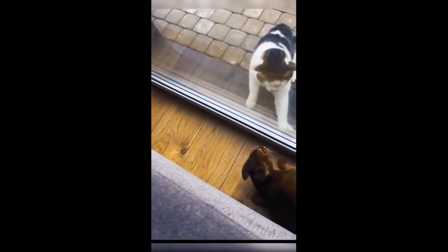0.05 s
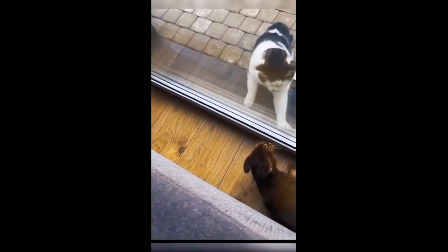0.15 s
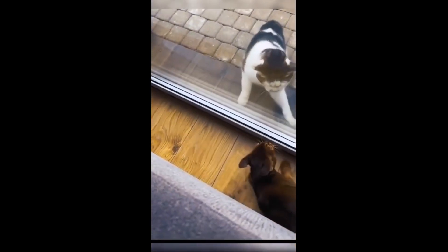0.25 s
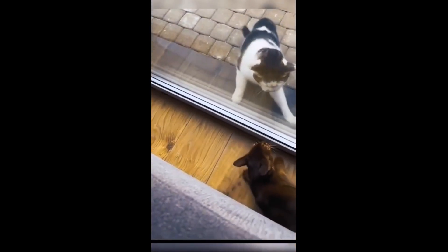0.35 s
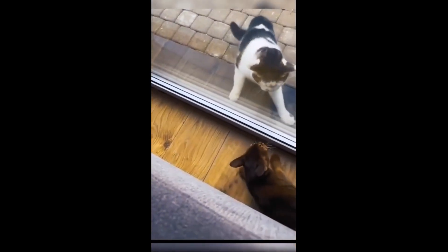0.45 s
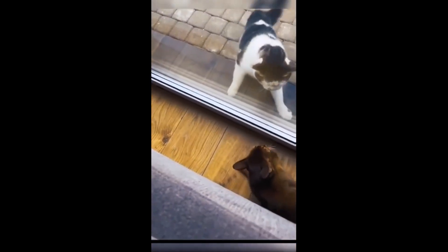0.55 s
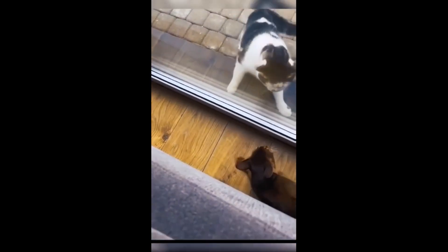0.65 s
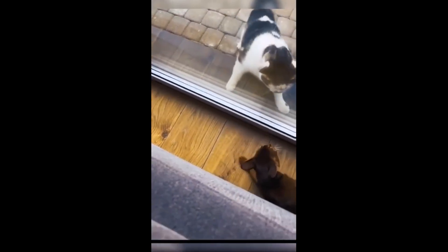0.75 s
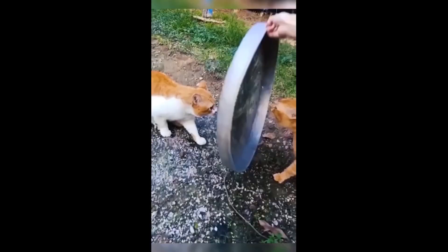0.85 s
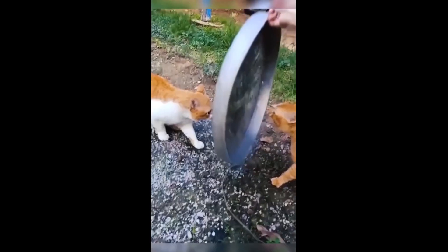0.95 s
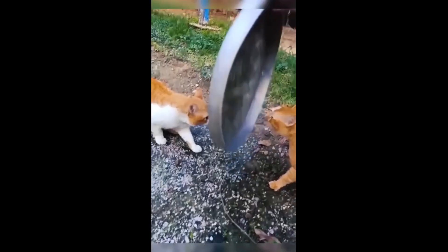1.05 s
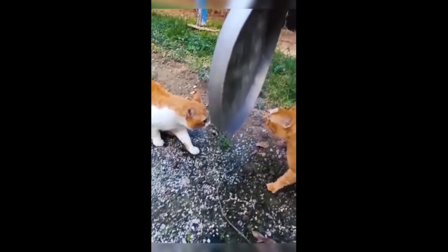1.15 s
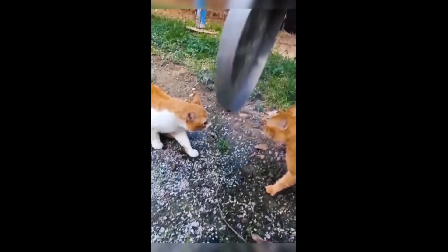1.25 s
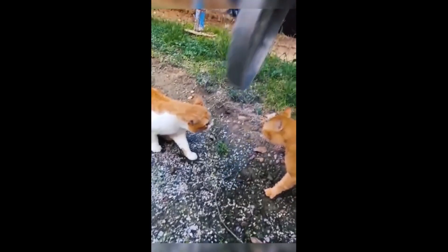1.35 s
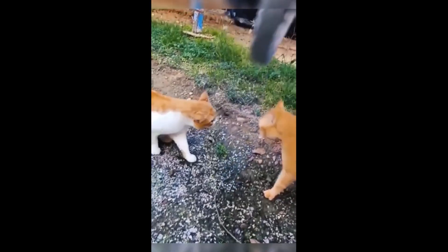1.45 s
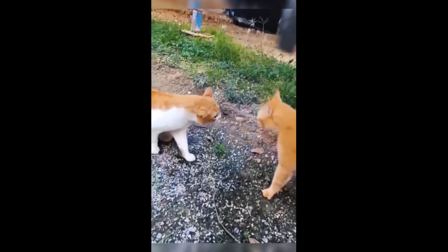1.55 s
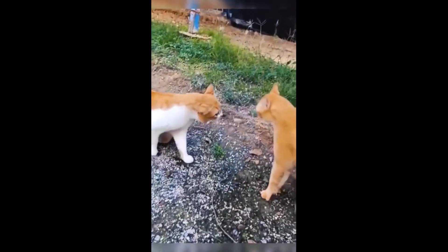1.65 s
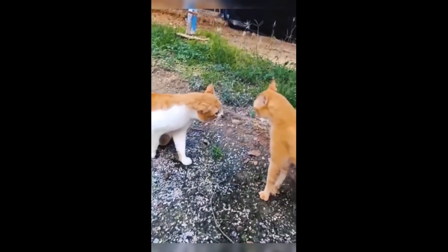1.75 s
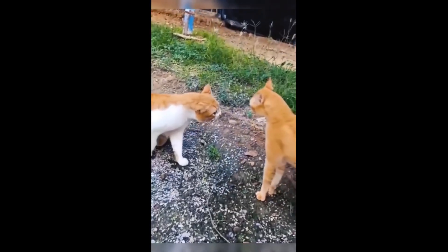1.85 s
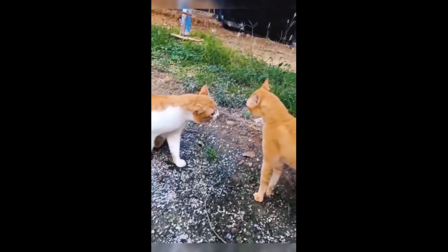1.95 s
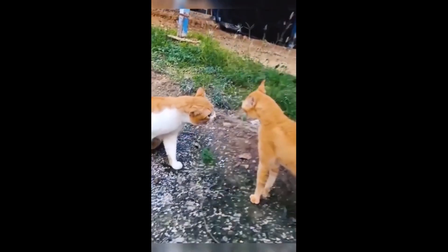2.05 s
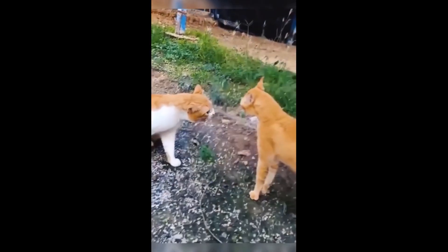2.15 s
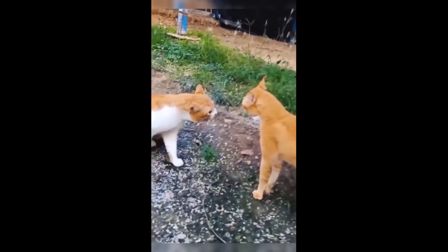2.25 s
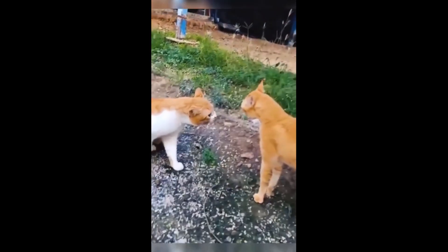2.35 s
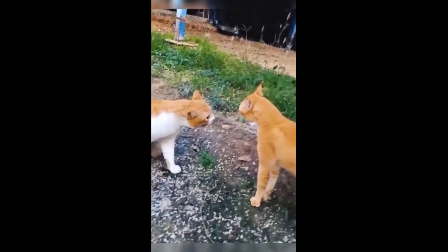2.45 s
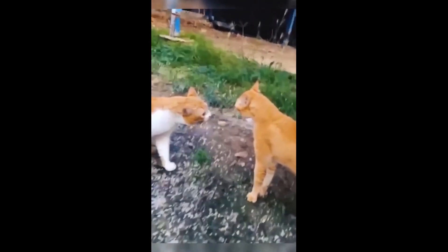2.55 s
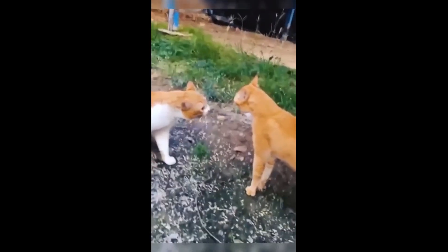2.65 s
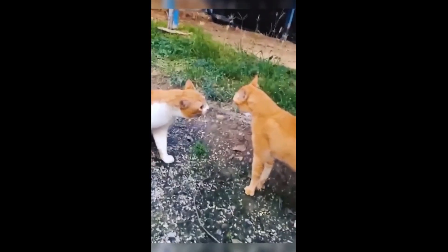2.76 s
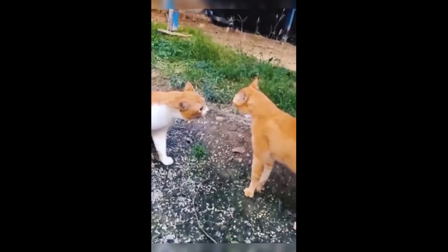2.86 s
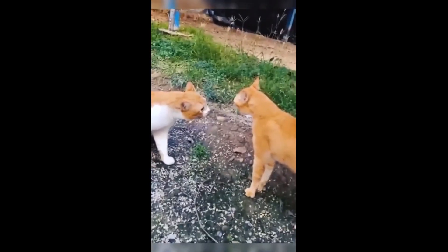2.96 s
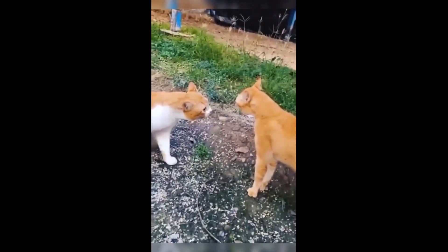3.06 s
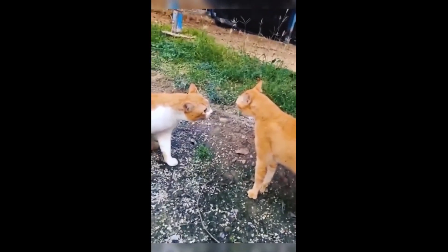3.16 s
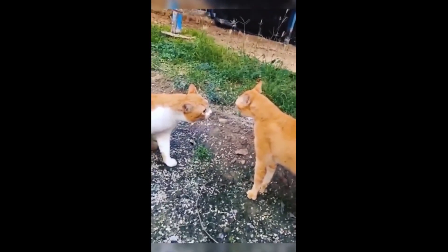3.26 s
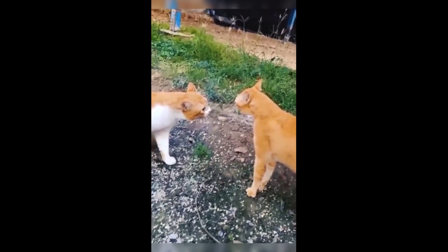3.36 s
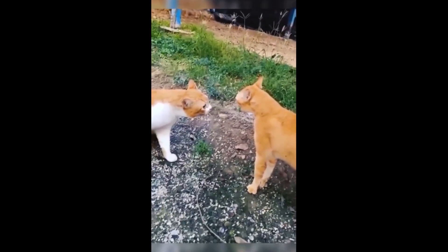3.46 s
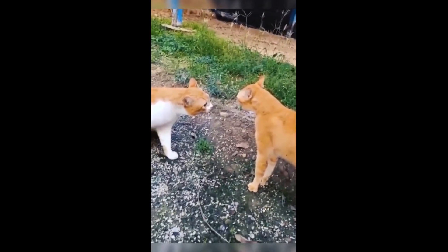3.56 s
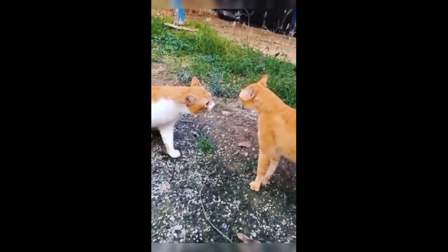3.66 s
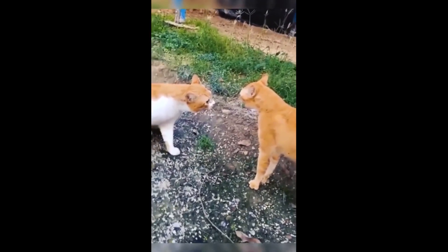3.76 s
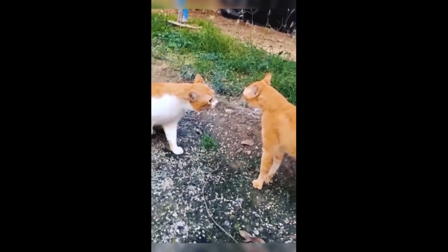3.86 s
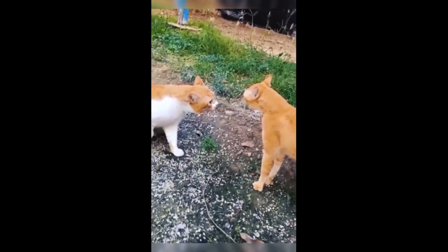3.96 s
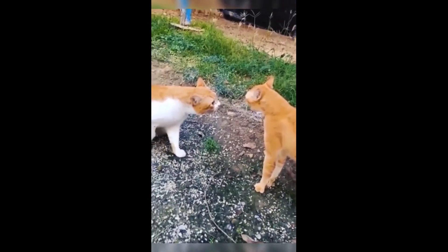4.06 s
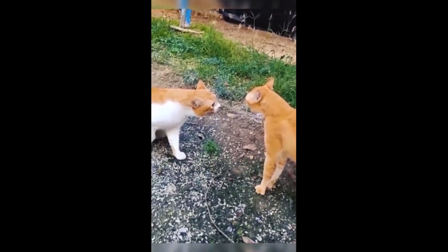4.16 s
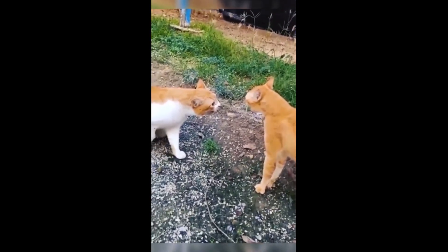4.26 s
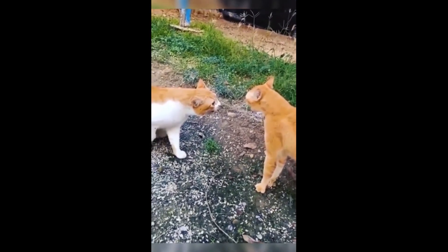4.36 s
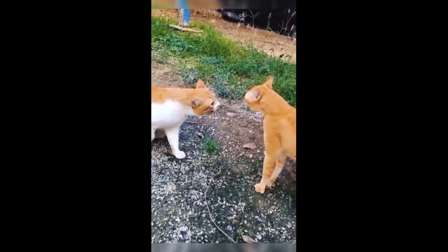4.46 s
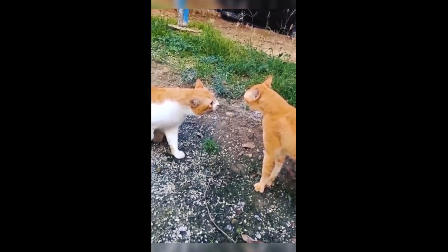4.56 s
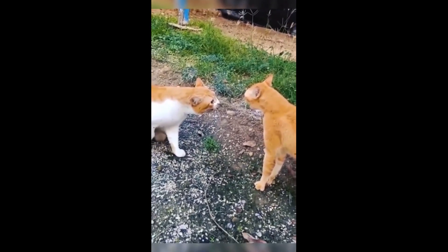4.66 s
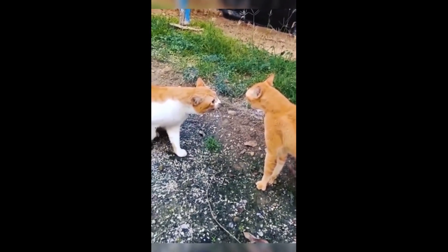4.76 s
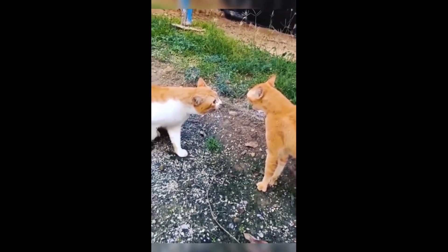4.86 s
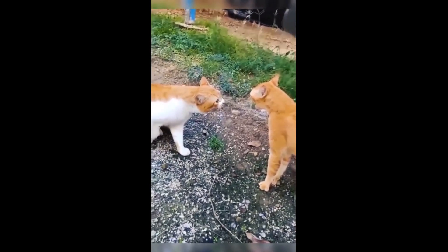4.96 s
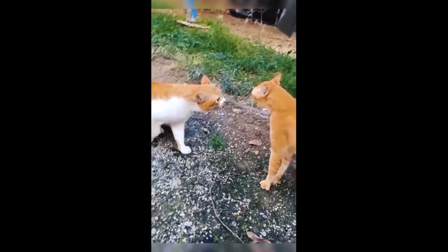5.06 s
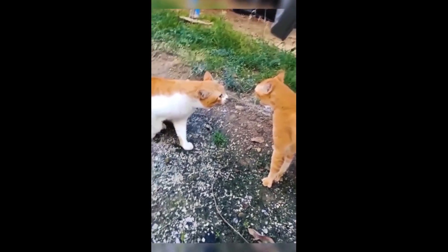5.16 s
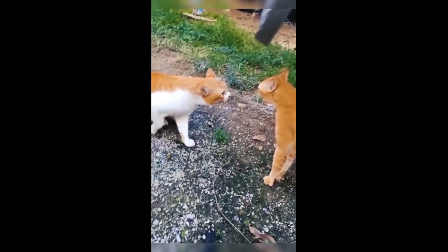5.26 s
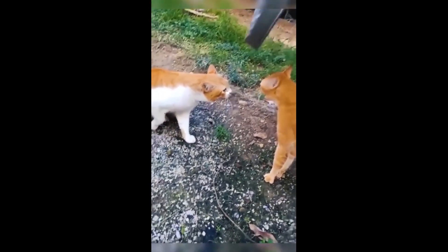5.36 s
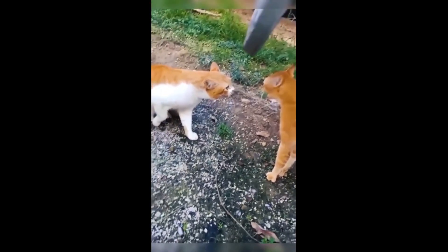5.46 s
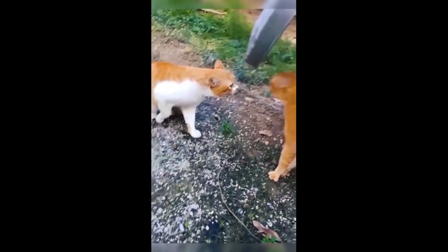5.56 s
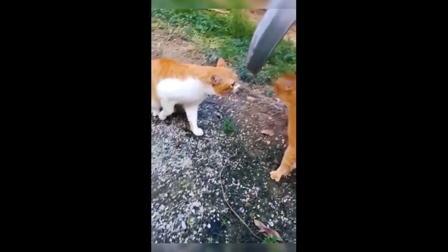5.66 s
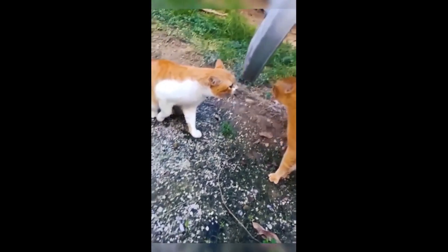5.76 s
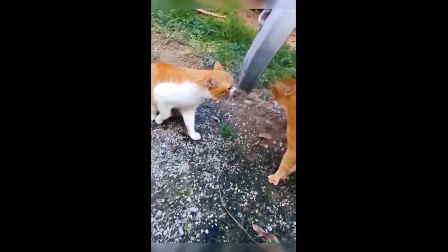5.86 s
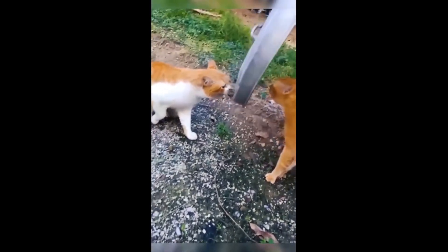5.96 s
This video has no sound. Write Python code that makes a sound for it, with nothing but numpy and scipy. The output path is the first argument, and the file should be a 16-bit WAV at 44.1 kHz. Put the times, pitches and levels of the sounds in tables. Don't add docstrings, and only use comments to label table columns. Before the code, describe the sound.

A brief raspy, hissing huff and knocks, then two cats face off outdoors: one screams and falls in long wavering yowls, the other moans low.

```python
import sys
import numpy as np
from scipy import signal
from scipy.fft import rfft, irfft
from scipy.io import wavfile
from scipy.ndimage import uniform_filter1d, minimum_filter1d

SR = 44100
rng = np.random.default_rng(int(sys.argv[2]) if len(sys.argv) > 2 else 0)


def wav_record(signal):
    frames = np.transpose(np.atleast_2d(signal))
    bounded = np.clip(frames, -1, 1)
    quanta = np.round(bounded * 32767).astype(np.int16)
    wavfile.write(sys.argv[1], SR, quanta)


def makeup_ratio(level_db):
    decades = np.asarray(level_db, float) / 20
    return 10 ** decades


N = 265482
YARD_S = 0.892
SHELF_HZ = 6550

# start_s, rasp_db
HUFF = [
    (0.0, -48),
    (0.126, -44.5),
    (0.16, -36.5),
    (0.284, -35),
    (0.306, -38),
    (0.346, -38.5),
    (0.422, -45.5),
    (0.482, -65),
    (0.52, -67),
]


def rms_one(x):
    return x / np.sqrt(np.mean(x ** 2) + 1e-20)


def at_hz(points, hz):
    return np.interp(np.log(hz), np.log(np.array(points)[:, 0]), np.array(points)[:, 1])


def in_time(rows):
    s, *columns = np.transpose(rows)
    return [np.interp(np.arange(N) / SR, s, c) for c in columns]


def drift(rate_hz, size):
    r = np.exp(-2 * np.pi * rate_hz / SR)
    return rms_one(signal.lfilter([1], [1, -2 * r, r * r], rng.standard_normal(size + 9000))[9000:])


def coloured(x, spectrum):
    hz = np.maximum(np.fft.rfftfreq(N, 1 / SR), 1)
    return rms_one(irfft(rfft(x) * makeup_ratio(at_hz(spectrum, hz)), N))


def resonate(x, hz, width_hz):
    r = np.exp(-np.pi * width_hz / SR)
    b = [(1 - r * r) / 2, 0, (r * r - 1) / 2]
    a = [1, -2 * r * np.cos(2 * np.pi * hz / SR), r * r]
    return signal.lfilter(b, a, x + 1e-18)


def bump(hz, centre_hz, width_hz, db):
    return makeup_ratio(db) / (1 + (2 * (hz - centre_hz) / width_hz) ** 2)


def near_cat():
    # start_s, pitch_hz, level_db, mouth_hz
    onset = [
        (1.392, 270.6, -49.5, 1070),
        (1.438, 382.4, -34, 1000),
        (1.47, 451.5, -41, 1100),
    ]
    rise = [(1.5, 547, -35, 2730), (1.56, 596, -22, 2570), (1.59, 639, -20.5, 2690),
            (1.612, 670.4, -12.5, 2620), (1.635, 708, -13.5, 2750), (1.66, 747, -16, 2930),
            (1.685, 776, -21.5, 3000), (1.72, 813.6, -16.5, 2582), (1.745, 843, -14.5, 2585),
            (1.77, 878.8, -11, 2590), (1.825, 905.6, -15.5, 2690), (1.845, 921, -16, 2663),
            (1.86, 923, -18, 2620)]
    peak = [
        (1.9, 922, -20, 2554),
        (1.95, 927, -19.5, 2448),
        (2.02, 905, -17.5, 2710),
        (2.078, 900, -16.5, 2550),
        (2.115, 886.7, -14, 2661),
        (2.15, 859, -16.5, 2616),
        (2.212, 858, -9.5, 2400),
        (2.228, 832, -17.5, 2400),
        (2.265, 805, -19, 2380),
        (2.3, 785.6, -25.5, 2430),
    ]
    slump = [
        (2.39, 775, -25, 2546),
        (2.42, 723, -30.5, 2040),
        (2.488, 713.5, -25.5, 1944),
        (2.546, 662, -27, 2437),
    ]
    fall = [
        (2.576, 549.2, -34, 2120),
        (2.72, 558, -32.5, 2080),
        (2.8, 548, -34.5, 2005),
        (2.9, 516, -24.5, 2107),
        (2.996, 505.5, -25, 2194),
        (3.1, 488.7, -25.5, 2053),
        (3.2, 460.3, -30, 1648),
    ]
    fade = [
        (3.292, 434.7, -34.5, 1547),
        (3.4, 420, -35, 1465),
        (3.5, 400, -30, 1530),
        (3.6, 395.4, -31, 1476),
        (3.7, 380, -30, 1500),
        (3.728, 376, -31, 1307),
        (3.754, 340, -37.5, 1310),
        (3.78, 319, -65.5, 1387),
    ]
    restart = [
        (4.25, 316.5, -51, 1256),
        (4.284, 339.3, -33, 1390),
        (4.304, 397.2, -35.5, 1380),
    ]
    swell = [
        (4.348, 454, -31.5, 1930),
        (4.39, 476, -28, 2180),
        (4.436, 497, -23, 2360),
        (4.526, 522, -22.5, 2470),
    ]
    again = [
        (4.6, 533.2, -23, 2535),
        (4.692, 537, -24.5, 2580),
        (4.776, 528.3, -23, 2480),
        (4.866, 505.3, -21.5, 2198),
        (5.122, 496, -22.5, 2130),
        (5.186, 487, -19, 2026),
        (5.324, 455.2, -29, 1550),
    ]
    mutter = [
        (5.366, 434.3, -22.5, 1320),
        (5.402, 435, -21.5, 1310),
        (5.43, 409.8, -31.5, 1150),
        (5.466, 381.6, -35, 1159),
        (5.61, 374.4, -32.5, 1214),
        (5.698, 349, -43, 1160),
        (5.762, 338.6, -37.5, 1160),
        (5.926, 334, -35, 1201),
        (6.02, 398.4, -25.5, 1527),
    ]
    # hz, db
    head, turned_head = [(400, -16), (800, -21), (1000, -14), (1200, -5), (2000, -1), (3500, -3),
                         (5000, -5), (6400, -7), (9000, -8), (11000, -16), (15000, -38)], [(400, -8), (750, -11.5), (1000, -10.5), (1200, -4), (2000, -3),
                                            (3500, -1), (5000, -4.5), (6400, -4), (9000, -5.5),
                                            (11000, -13.5), (15000, -38.5)]
    scream = near_phrase(onset, tilt_db=-5.5, rough=0.24, chest_db=-46.5)
    scream += near_phrase(rise, tilt_db=1.3, rough=0.13, chest_db=-50.5)
    scream += near_phrase(peak, tilt_db=-0.8, rough=0.16, chest_db=-54.5)
    scream += near_phrase(slump, tilt_db=-9.5, rough=0.12, chest_db=-59.0)
    scream += near_phrase(fall, tilt_db=-8.5, rough=0.016, chest_db=-57.0)
    scream += near_phrase(fade, tilt_db=-10.0, rough=0.012, chest_db=-52.5)
    later = near_phrase(restart, tilt_db=-4, rough=0.026, chest_db=-56.5)
    later += near_phrase(swell, tilt_db=-7.0, rough=0.065, chest_db=-60.0)
    later += near_phrase(again, tilt_db=-8.0, rough=0.0083, chest_db=-57.5)
    later += near_phrase(mutter, tilt_db=-2.5, rough=0.035, chest_db=-47)
    first = voice(scream, head, mouth_db=25.5, width_hz=277, flutter_db=1.0, fade_s=(0.005, 0.012), tract=True)
    second = voice(later, turned_head, mouth_db=30, width_hz=297, flutter_db=1.0, fade_s=(0.03, 0.001),
                   tract=True)
    return first + second


def near_phrase(rows, tilt_db, rough, chest_db):
    break_hz, break_span_hz = 620, 340
    chaos_s, chaos_width_s, chaos_rough = 1.95, 0.13, 0.51
    s, pitch, level_db, mouth = np.transpose(rows)
    same = np.ones(len(s))
    strain = np.clip((pitch - break_hz) / break_span_hz, 0, 1) ** 2
    chaos = chaos_rough * np.exp(-((s - chaos_s) / chaos_width_s) ** 2)
    idle_throat = mouth
    return list(zip(s, pitch, level_db, mouth, idle_throat, tilt_db * same,
                    rough * (1 + strain) + chaos, chest_db * same))


def voice(rows, head, mouth_db, width_hz, flutter_db, fade_s, throat_db=0, order=0, tract=False):
    # start_s, throat_hz, lift_db, width_hz
    throat_path = [(1.438, 2680, 13, 340.0), (1.5, 2580, 24.5, 870.0), (1.56, 2770, 34, 527),
                   (1.628, 4110, 7.5, 193), (1.685, 3500, 17.5, 1420), (1.72, 3400, 15, 1400.0),
                   (1.77, 3240, 11.5, 1400.0), (1.83, 3930, 19.5, 800.0), (1.9, 4036, 19.5, 800.0),
                   (1.95, 3830, 12, 1088), (2.02, 3830, 34, 645.6), (2.078, 3668, 14.5, 210.0),
                   (2.15, 3190, 32.5, 197), (2.21, 2580, 38.5, 420.0), (2.3, 2627, 33, 1254),
                   (2.386, 2780.0, 27, 624), (2.496, 3390, 25.5, 199), (2.546, 2735, 23, 1370),
                   (2.63, 2864, 19, 1400.0), (2.72, 3314, 22.5, 1460), (2.8, 3050, 25, 1405),
                   (2.9, 2970, 19, 980.0), (2.996, 2920.0, 7, 200.0), (3.1, 3160.0, 24.5, 293),
                   (3.2, 2960, 8.5, 200.0), (3.292, 3040, 14.5, 251), (3.4, 3020, 24.5, 250.0),
                   (3.5, 2963, 17, 300.0), (3.6, 3010.0, 26.5, 209.3), (3.7, 2690, 25, 205),
                   (4.304, 2660.0, 19, 202.8), (4.348, 3090, 38, 230.0), (4.436, 3070, 14.5, 537),
                   (4.526, 2990, 19.5, 310.0), (4.692, 3380, 23, 1250.0), (4.776, 2850, 16.5, 965),
                   (4.866, 2755, 25.5, 353), (5, 3086, 19, 200.0), (5.122, 3152, 24.5, 230.0),
                   (5.186, 3000, 8, 203), (5.26, 2800, 13.5, 200.0), (5.324, 2360, 11, 199),
                   (5.398, 3030, 15, 200.0), (5.466, 2930, 13.5, 200.0), (5.61, 3170, 21.5, 210.0),
                   (5.698, 2920, 25, 293.2), (5.762, 2935, 19, 200.0), (5.85, 3010, 17.5, 203),
                   (5.926, 3020, 19, 200.0), (5.98, 2890, 23.5, 203)]
    # start_s, upper_hz, lift_db, notch_hz
    upper_path = [(1.438, 6020, 14.5, 4310.0), (1.5, 5760, 11.5, 4270), (1.56, 5930, 7, 5410.0),
                  (1.628, 5730.0, -10.5, 6100), (1.685, 5730.0, 0.5, 4760), (1.72, 5720.0, 8, 4550),
                  (1.77, 5530.0, -1, 5830), (1.83, 5250, 5, 6300.0), (1.9, 5530, 10, 6440),
                  (1.95, 5520.0, 0.5, 3610), (2.02, 4560.0, 1.5, 3708), (2.078, 4640, 2.5, 3740),
                  (2.15, 4500.0, 0, 4270.0), (2.21, 4500.0, -6, 4500), (2.3, 5500, 6, 4050),
                  (2.386, 5040, 27, 3950.0), (2.496, 4530, 14, 5000), (2.546, 5970, 11.5, 4740.0),
                  (2.63, 5850, 21, 5550), (2.72, 4720, 20, 5240), (2.8, 6240.0, 12, 5120.0),
                  (2.9, 4215, 6, 3620), (2.996, 4180, 2.5, 5100), (3.1, 4670.0, -6, 4830),
                  (3.2, 5690, 1.5, 3710), (3.292, 6090, 7, 3357), (3.4, 5690, 9, 5070),
                  (3.5, 5870, 7.5, 3680), (3.6, 5430, 6.5, 3600.0), (3.7, 5590, 7, 3460.0),
                  (4.304, 5330, -15.5, 3590.0), (4.348, 5950, 8, 3600), (4.436, 6120, 4, 4870.0),
                  (4.526, 4220, 14.5, 4670), (4.692, 5670, 19, 4760), (4.776, 4160, 9, 6270),
                  (4.866, 4060, 4, 5514), (5, 4080, 6.5, 5460.0), (5.122, 3940, 0, 4960.0),
                  (5.186, 5130, -8, 4890.0), (5.26, 5380, 15.5, 4730.0), (5.324, 5540, 3, 3560.0),
                  (5.41, 5400, 11.5, 4030), (5.466, 5130, 20, 4400), (5.61, 4980, 13, 4840),
                  (5.698, 4260, 14, 3830), (5.762, 4310.0, 16, 5830), (5.85, 4500, 15, 3800),
                  (5.926, 4420, 7, 3700.0), (5.98, 5010, 6, 3840)]
    # start_s, second_hz, share (0-1)
    second_voice = [
        (1.7, 250.6, 0.14),
        (1.8, 251, 0),
        (1.88, 250.3, 0.3),
        (2.0, 249.8, 0.8),
        (2.08, 256.5, 0.26),
        (2.18, 249, 0),
        (2.28, 274.5, 0.2),
        (2.37, 190, 0.3),
        (2.47, 189.6, 0.03),
    ]
    s, *columns = np.transpose(rows)
    at = np.arange(round(s[0] * SR), min(round(s[-1] * SR), N))
    curves = [np.interp(at / SR, s, c) for c in columns]
    pitch, level_db, mouth, throat, tilt, rough, *more = [
        uniform_filter1d(c, size=900, mode="nearest") for c in curves]
    rough = rough + 0.008 * np.abs(np.gradient(np.log(pitch))) * SR

    jittered_hz = pitch * (1 + 0.001 * drift(25, len(at)))
    turn = 2 * np.pi * np.cumsum(jittered_hz) / SR + 0.35 * rough * drift(120, len(at))

    coarse = slice(None, None, 64)
    multiples = np.arange(1, 41)
    hz = multiples[:, None] * pitch[coarse]
    lift = 0.5 + bump(hz, mouth[coarse], width_hz, mouth_db)
    if tract:
        throat, throat_db, throat_width_hz, upper_hz, upper_db, notch_hz = [
            c[at][coarse] for c in in_time(throat_path) + in_time(upper_path)]
        lift = lift + bump(hz, throat, throat_width_hz, throat_db) + bump(hz, upper_hz, 300, upper_db)
        lift = lift / (1 + bump(hz, notch_hz, 230, 10))
    else:
        lift = lift + bump(hz, throat[coarse], width_hz, throat_db)
    gains = lift * makeup_ratio(at_hz(head, hz) + tilt[coarse] * np.log2(hz / 1000)) * (hz < 15500)
    if order:
        gains = gains / gains[order - 1]
    else:
        gains = gains / np.sqrt(((gains * (hz < SHELF_HZ)) ** 2).sum(axis=0))
    if more:
        gains[0] = makeup_ratio(more[0] - level_db)[coarse]

    wobble = uniform_filter1d(rng.standard_normal(gains.shape), size=40)
    flutter_db = flutter_db * (1 + 1.2 * np.clip(rough[coarse], 0, 1))
    gains = gains * makeup_ratio(flutter_db * np.clip(rms_one(wobble), -1.6, 1.6))
    chest, *upper = [np.interp(at, at[coarse], g) * np.sin(k * turn + k * k * 0.23)
                     for k, g in zip(multiples, gains)]

    shake = np.clip(rough, 0, 1) * (drift(240, len(at)) + (0.2 + rough / 3) * drift(1500, len(at)))
    if tract:
        second_hz, share = [c[at] for c in in_time(second_voice)]
        second_turn = 2 * np.pi * np.cumsum(second_hz * (1 + 0.03 * drift(30, len(at)))) / SR
        shake = shake + 2 * np.clip(share, 0, 1) * np.sin(second_turn)
    rasp_floor = signal.butter(4, 1320, "high", fs=SR, output="sos")
    rasp = signal.sosfilt(rasp_floor, sum(upper) * np.tanh(shake))

    fade = np.clip(np.minimum((at - at[0]) / fade_s[0], (at[-1] - at) / fade_s[1]) / SR, 0, 1)
    folds = chest * (1 + 0.9 * np.tanh(shake)) + sum(upper) + rasp
    out = np.zeros(N)
    out[at] = np.sqrt(2) * makeup_ratio(level_db) * folds * fade
    return out


def far_cat():
    # start_s, pitch_hz, level_db (of the clearest partial), tilt_db_per_octave
    first_call = [
        (0.892, 375.8, -47.5, 8),
        (1.152, 351, -49, 6.5),
        (1.3, 326.3, -48, 0.5),
        (1.416, 272, -46, 4.5),
        (1.56, 291, -66, -4),
    ]
    second_call = [(1.66, 375, -70, -10), (1.7, 406.5, -53.5, -16.5), (1.82, 472.4, -45.5, -10),
                   (1.922, 523.7, -33, 9), (1.976, 600.6, -40.5, 12.5), (2.038, 622, -39.5, 8.5),
                   (2.124, 663.4, -38.5, 15), (2.218, 647.7, -43.5, 4.5), (2.285, 593, -36.5, 3),
                   (2.305, 495, -26.5, 17.5), (2.35, 457, -33, 16.5)]
    sigh = [
        (2.42, 420.3, -48.5, 16.5),
        (2.62, 337.7, -62, 18),
        (2.799, 292.6, -69, -7.5),
        (2.95, 229, -70, 17.5),
    ]
    third_call = [
        (3.83, 210.9, -62, -18),
        (3.844, 223.8, -57, -21.5),
        (3.906, 335.7, -56, -15),
        (3.998, 393.5, -59, -6.5),
        (4.07, 415.7, -58.5, -2.2),
        (4.25, 406.7, -58, -3),
        (4.34, 407.4, -56, -2.5),
        (4.448, 421.9, -62, 0.5),
        (4.55, 415.2, -57, 0.5),
        (4.72, 349.4, -54, -12.5),
    ]
    tail = [
        (4.9, 290.8, -60.5, -12.5),
        (5.172, 235, -60.5, -14),
        (5.506, 216.9, -57, -23),
        (5.672, 234.7, -56, -18),
        (5.88, 209, -66, -10.5),
    ]
    # hz, db
    shut_head, cry_head, open_head = [(350, 21), (750, 11), (1500, 0), (2200, -26.5), (4000, -41.5),
                                      (8000, -65)], [(400, -3), (950, -10), (1450, 0), (2200, -8),
                                                         (3000, -24), (7000, -48), (12000, -85)], [(200, -17), (450, 1),
                                                                           (800, -10.5), (1200, -0.5),
                                                                           (2000, -7), (2700, -2),
                                                                           (3500, -14.5), (4800, -5),
                                                                           (6000, -9.5), (12000, -51.5)]
    low = held_phrase(first_call, 655, 4380, 0.057)
    cry = held_phrase(second_call, 1332, 1900, 0.033, -59.5) + held_phrase(sigh, 950, 3180, 0.05, -62.0)
    moan = held_phrase(third_call, 1283, 1990, 0.016) + held_phrase(tail, 700, 800, 0.043)
    first = voice(low, shut_head, mouth_db=4, throat_db=21, width_hz=190, flutter_db=0.7,
                  fade_s=(0.001, 0.05), order=2)
    second = voice(cry, cry_head, mouth_db=15, throat_db=12, width_hz=500, flutter_db=1.5,
                   fade_s=(0.05, 0.03), order=3)
    third = voice(moan, open_head, mouth_db=24.0, throat_db=23.0, width_hz=328, flutter_db=4.0,
                  fade_s=(0.02, 0.05), order=1)
    return first + second + third


def held_phrase(rows, mouth_hz, throat_hz, rough, *chest_db):
    return [(s, pitch, level_db, mouth_hz, throat_hz, tilt_db, rough, *chest_db)
            for s, pitch, level_db, tilt_db in rows]


def door_cat():
    # hz, width_hz, level_db
    rasp_rings = [(149.5, 37, 6.5), (266, 294, 17), (454, 34, 4), (596, 16, -12), (980, 140, -34)]
    # hz, db_per_hz
    hiss_colour = [(410, -21), (700, -2.5), (1030, -6), (1360, -0.5), (1760, -6.5), (2370, -4.5),
                   (5210, -13), (5640, -14.5), (6250, -17), (12600, -20.5), (15500, -26)]
    # start_s, pitch_hz, level_db, tilt_db_per_octave
    whine_path = [
        (0.46, 750, -63.5, 12),
        (0.568, 694, -63, 1.5),
        (0.758, 703, -64.5, 0),
        (0.896, 737, -61, 14),
    ]
    # hz, db
    whine_head = [(1400, -11), (2100, -5), (2800, 3), (3500, -6), (4200, -9), (5000, 0), (6500, -6),
                  (8000, -17), (12000, -26)]
    t = np.arange(N) / SR
    rasp_db, = in_time(HUFF)
    hiss_db = -44.5 + 0.87 * (rasp_db + 35.5)
    pulses = (rng.random(N) < 900 / SR) * makeup_ratio(1.16 * rng.exponential(1, N)) * rng.choice([-1, 1], N)
    rasp = sum(makeup_ratio(db) * rms_one(resonate(resonate(pulses, hz, width), hz, 210))
               for hz, width, db in rasp_rings)
    hiss = coloured(rng.standard_normal(N), hiss_colour) * makeup_ratio(2.2 * drift(14, N) + 1.2 * drift(60, N))
    ends = np.clip((HUFF[-1][0] - t) / 0.018, 0, 1)
    huff = ends * (makeup_ratio(rasp_db) * rms_one(rasp) + makeup_ratio(hiss_db + 0.5) * hiss)
    whine = voice(held_phrase(whine_path, 2170, 3640, 0.19), whine_head, mouth_db=22, throat_db=24,
                  width_hz=380, flutter_db=3.0, fade_s=(0.04, 0.003))
    doorway_air = makeup_ratio(-77) * hiss * (t < YARD_S)
    return huff + whine + doorway_air


def ticks():
    # start_s, peak_db, ring_hz, t60_s, noise_top_hz
    contacts = [
        (0.149, -37, 447, 0.057, 900),
        (0.278, -30, 620, 0.044, 2670),
        (0.333, -38.5, 2010, 0.058, 2980),
        (0.351, -33, 1163, 0.051, 2000),
        (0.647, -57.5, 660, 0.074, 1200),
        (2.92, -58, 1218, 0.13, 1500),
        (3.927, -52, 5200, 0.022, 6300),
        (5.896, -39, 307, 0.027, 4940),
    ]
    out = np.zeros(N)
    for s, peak_db, hz, t60, top_hz in contacts:
        start = round(s * SR)
        after = np.arange(min(3000, N - start)) / SR
        low_pass = signal.butter(4, top_hz, fs=SR, output="sos")
        puff = rms_one(signal.sosfilt(low_pass, rng.standard_normal(3000)))[:len(after)]
        shape = np.minimum(after / 0.00043, 1) * makeup_ratio(peak_db - 60 * after / max(t60, 0.005))
        out[start:][:3000] += shape * (np.sin(2 * np.pi * hz * after) + 0.6 * puff)
    return out


def air(near):
    # hz, db_per_hz
    rumble_colour, still_colour, breath_colour = [(20, -49.5), (40, -19.5), (100, -1.5), (200, -7),
                                                  (350, -14.5), (700, -30), (3000, -97.5)], [(100, -7), (250, -3), (550, -7),
                                                                  (1200, -13), (2500, -22), (4500, -30.5),
                                                                  (6500, -29), (16000, -60.5)], [(100, -19), (250, -16),
                                                                                     (650, -10.5),
                                                                                     (1200, -6),
                                                                                     (2500, -22),
                                                                                     (4500, -22.5),
                                                                                     (6500, -26),
                                                                                     (16000, -41.5)]
    duck_s, duck_db = 1.8, 6.5
    deepest_s, deepest_db, recover_db_per_s = 2, 21, 5
    t = np.arange(N) / SR
    ducked_db = np.interp(t, [duck_s - 0.01, duck_s + 0.01, deepest_s], [0, duck_db, deepest_db])
    ducked_db = ducked_db - recover_db_per_s * np.maximum(t - deepest_s, 0)

    shaken = makeup_ratio(in_time(HUFF)[0] - 27) * (t < YARD_S)
    rumble = (makeup_ratio(-60.5 - ducked_db) + shaken) * makeup_ratio(0.6 * drift(6.0, N))
    rumble = rumble * coloured(rng.standard_normal(N), rumble_colour)

    still_db = np.where(t < YARD_S, -70, -59 - 0.47 * ducked_db)
    still = makeup_ratio(still_db) * coloured(rng.standard_normal(N), still_colour)

    yowl_db = 10 * np.log10(uniform_filter1d(near ** 2, size=4000) + 1e-12)
    breath_db = -54 + 0.46 * (yowl_db + 14.5)
    breath = makeup_ratio(breath_db) * coloured(rng.standard_normal(N), breath_colour)
    return rumble + (still + breath) * makeup_ratio(0.77 * drift(21, N))


def yard(x, t60):
    after = np.arange(SR // 4) / SR
    echo = rng.standard_normal(len(after)) * makeup_ratio(-60 * after / t60) * (after > 0.008)
    return signal.fftconvolve(x, echo / np.sqrt(np.sum(echo ** 2)))[:N]


def scene():
    # hz, db
    microphone = [(20, -8.5), (200, -7), (6500, 0.5), (6650, -20.5), (7800, -7.5), (10000, -15),
                  (16000, -38)]
    near = near_cat()
    cats = near + far_cat()
    outside = cats + makeup_ratio(-20) * yard(cats, t60=0.22) + air(near)
    hz = np.maximum(np.fft.rfftfreq(N, 1 / SR), 1)
    heard = irfft(rfft(outside) * makeup_ratio(at_hz(microphone, hz)), N)
    return (heard + door_cat() + ticks())[None]


def copy_up(frames):
    edge, copy_bins = round(SHELF_HZ * 1536 / SR), 192

    def outline(part):
        power = uniform_filter1d(np.abs(part) ** 2, size=30, axis=1)
        return np.sqrt(uniform_filter1d(power, size=3, axis=2) + 1e-16)

    bins = np.arange(edge, frames.shape[1])
    source = frames[:, edge - copy_bins + (bins - edge) % copy_bins]
    top = source / outline(source) * outline(frames[:, edge:])
    return np.concatenate([frames[:, :edge], top], axis=1)


def thin_out(x, margin_db, depth_db, scatter_db):
    frames = copy_up(signal.stft(x, nperseg=1536, noverlap=1152)[2])
    level_db = 20 * np.log10(np.abs(frames) + 1e-9)
    masker_db = -minimum_filter1d(-level_db, size=25, axis=1)
    local_db = uniform_filter1d(uniform_filter1d(level_db, size=3, axis=1), size=5, axis=2)
    patches = uniform_filter1d(rng.standard_normal(frames.shape), size=6, axis=1)
    patches = rms_one(uniform_filter1d(patches, size=15, axis=2))
    under = (masker_db - local_db - margin_db + scatter_db * patches) / 0.42
    thinned = frames * makeup_ratio(-depth_db / (1 + np.exp(-under)))
    return signal.istft(thinned, nperseg=1536, noverlap=1152)[1][:, :N]


def roll_off(x):
    return signal.sosfilt(signal.butter(12, 15630, fs=SR, output="sos"), x)


def record(dry):
    thinned = thin_out(dry, margin_db=27.5, depth_db=22, scatter_db=9)
    return roll_off(thinned)


dry = scene()
out = record(dry)
wav_record(out)
```